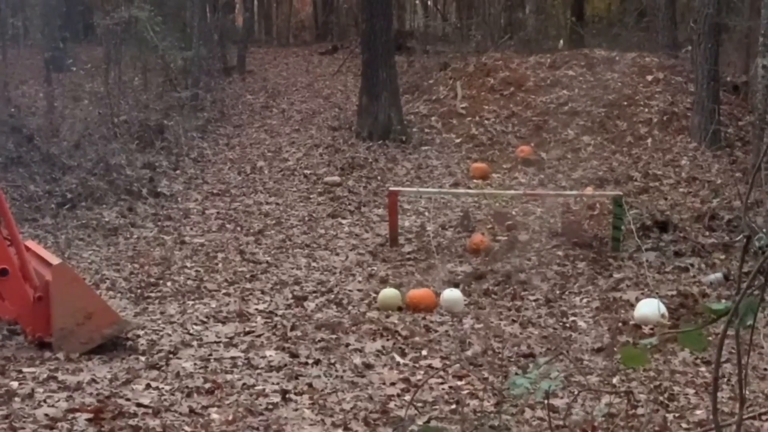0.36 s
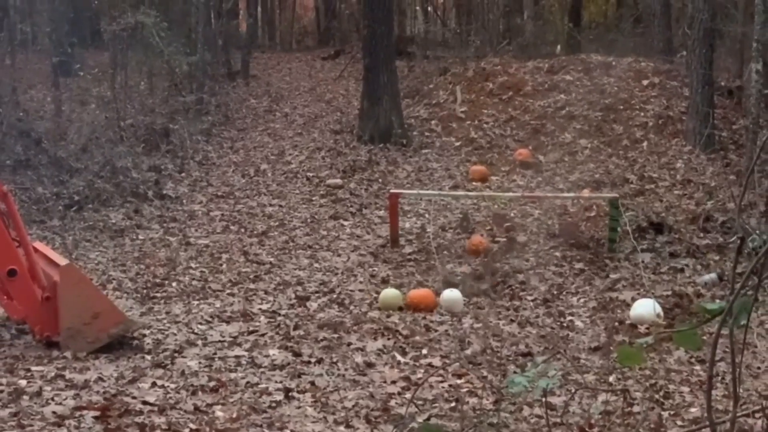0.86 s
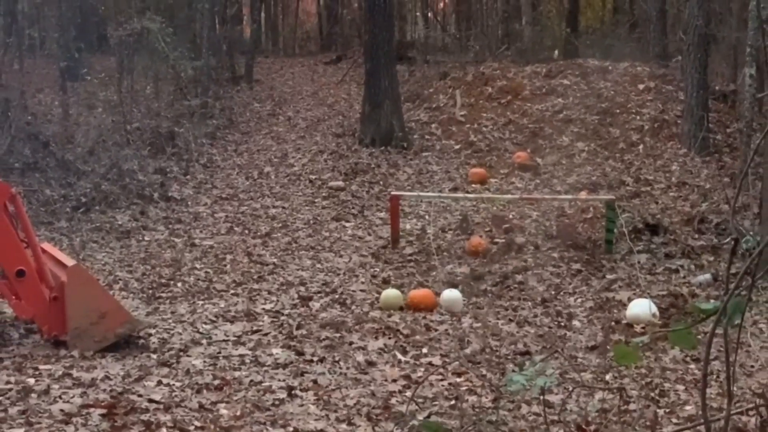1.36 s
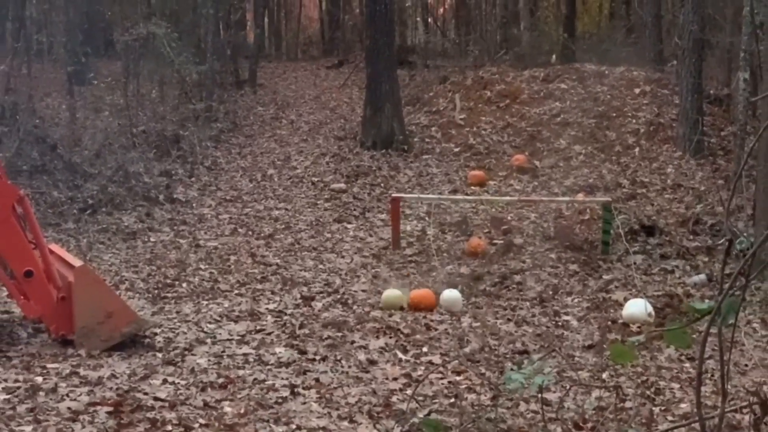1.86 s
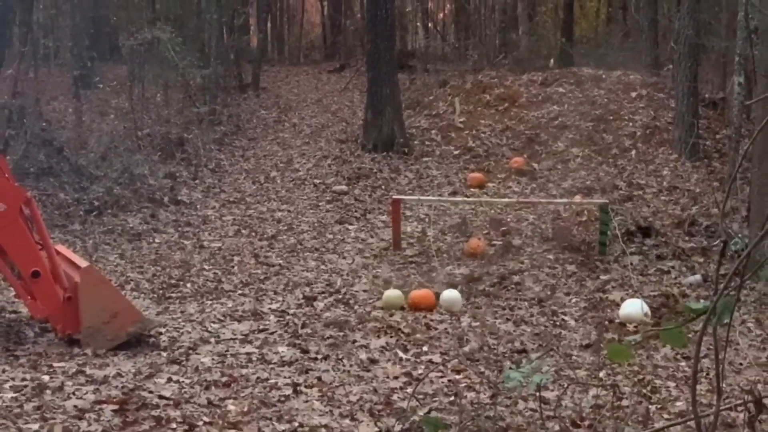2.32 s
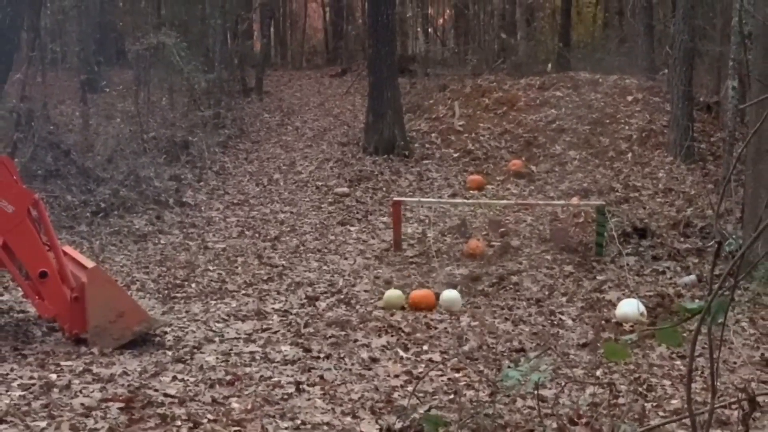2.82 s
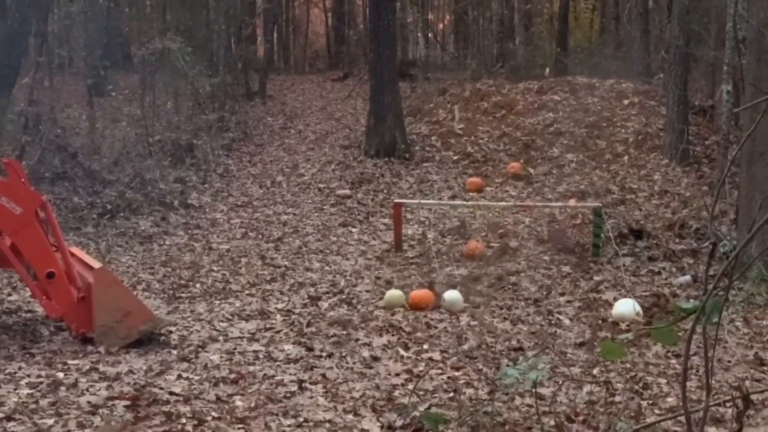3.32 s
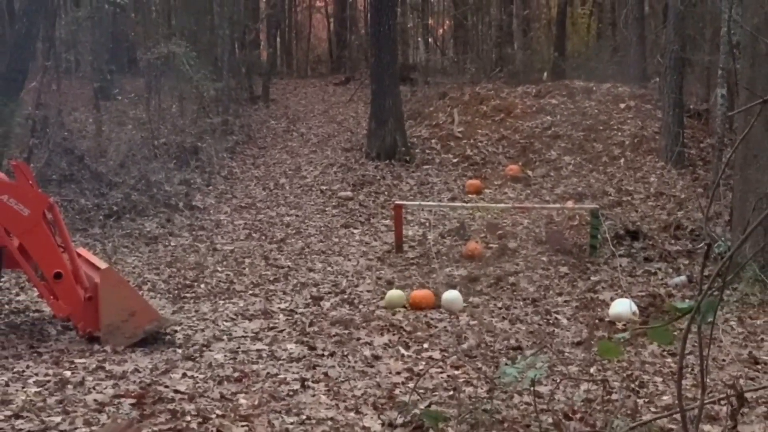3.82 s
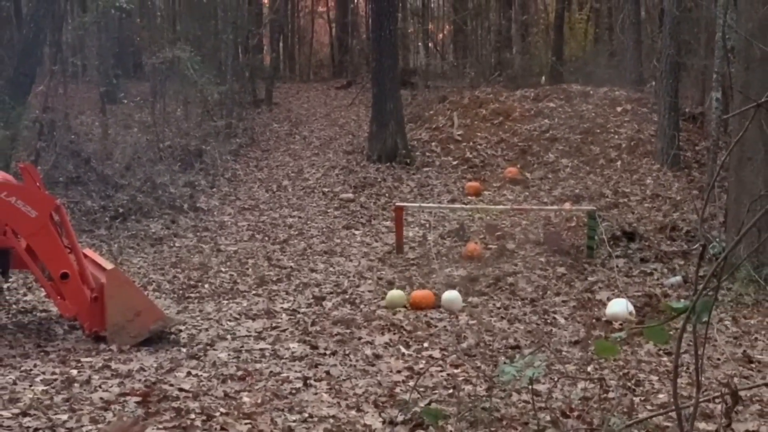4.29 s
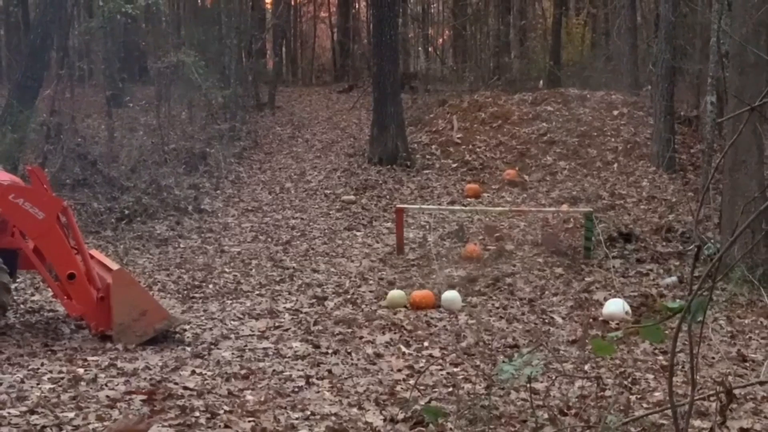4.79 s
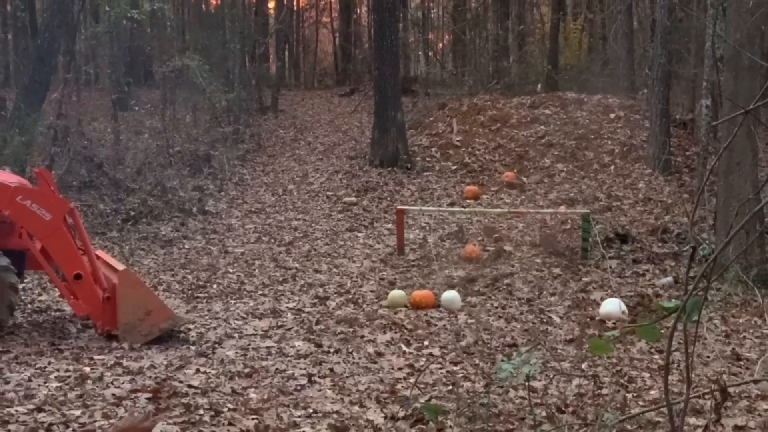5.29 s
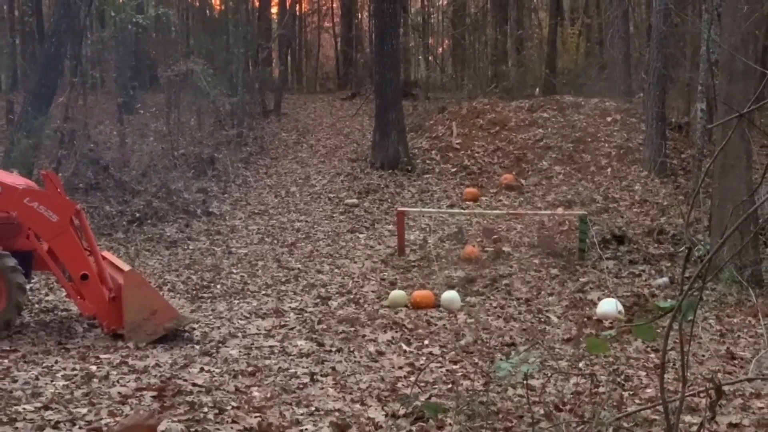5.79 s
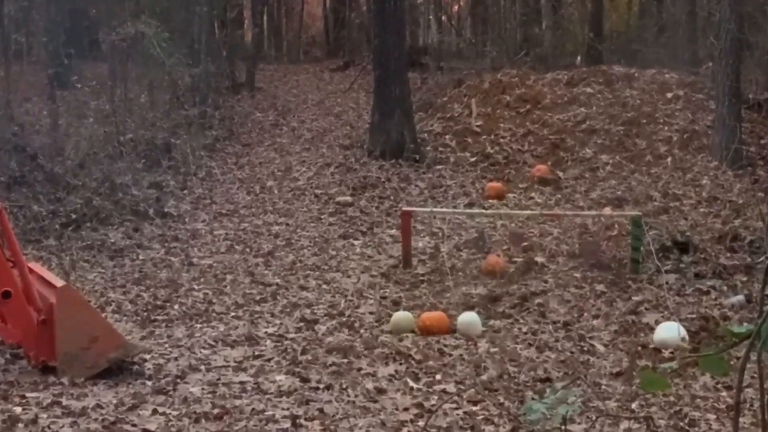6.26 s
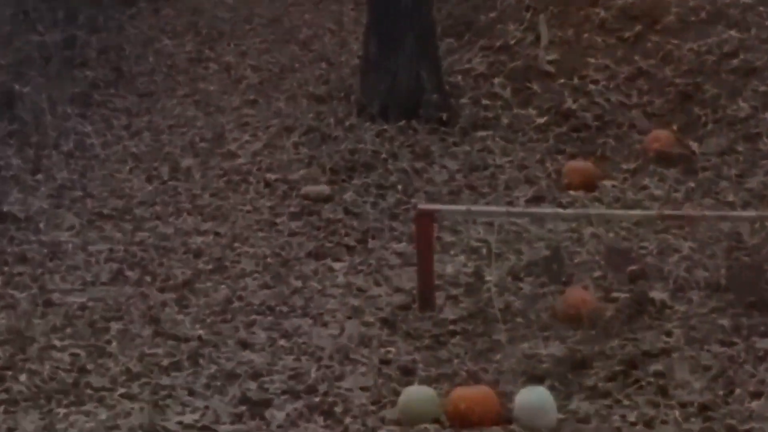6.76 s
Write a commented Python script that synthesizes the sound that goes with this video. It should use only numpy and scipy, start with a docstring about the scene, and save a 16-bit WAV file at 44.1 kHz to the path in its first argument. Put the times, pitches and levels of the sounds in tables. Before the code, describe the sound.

Loud handgun shots crack and thump close by among trees, singly and in quick pairs, their echoes rolling away until the sound abruptly drops.

```python
"""Two pistols in a forest clearing

A sharp and a dull pistol fire in irregular order near a stereo camera, among leafy trees.
Each blast is a low heave, thumps and cracks as ground and nearest trunks return it, crackling
noise and a long woodland tail; much of each pistol's echo noise repeats from shot to shot.
Noise bursts make dry leaves tick over faint, patchy air. The camera squashes the peaks,
and the sound drops sharply near the end."""
import sys
import numpy as np
from scipy import signal
from scipy.fft import rfft, irfft, next_fast_len
from scipy.io import wavfile
from scipy.ndimage import uniform_filter1d

SR = 44100
rng = np.random.default_rng(int(sys.argv[2]) if len(sys.argv) > 2 else 0)


def to_wav(s):
    """Save 16-bit WAV."""
    ch = np.atleast_2d(s).T  # columns
    pcm = np.round(np.clip(ch, -1, 1) * 32767)  # PCM
    wavfile.write(sys.argv[1], SR, pcm.astype(np.int16))


def rack_gain(trim_db):
    """Turn a fader trim in dB into the linear factor to multiply a signal by."""
    fader = np.asarray(trim_db, float)
    return 10 ** (fader / 20)


N = 314433  # samples

# The shots. Each row: start in seconds, pistol (0 sharp, 1 dull), strength in dB.
SHOTS = [(-.047, 1, -2), (.216, 0, -1.52), (.824, 1, -0.5), (1.5598, 0, -0.85), (1.9613, 1, -0.6),
         (3.001, 1, -1.33), (3.198, 0, -1.5), (4.015, 1, -1), (4.514, 0, -0.7), (5.974, 0, -1.43)]
# Direct and echoed arrivals, one list per pistol, before random spread and shot strength.
# Each row: delay in seconds, thump pitch in Hz, left thump in dB, right thump in dB, crack in dB.
ARRIVALS = [
    [(-.0005, 570, -19, -26, -20), (.002, 232.3, -18.5, -9, -29), (.0055, 160.5, -14, -39.5, -28.5),
     (.0135, 607, -16.5, -18.5, -32.5), (.021, 630, -15.5, -18.5, -31), (.029, 209, -16, -34, -39),
     (.056, 684, -14, -31, -22), (.0605, 226, -17, -16, -34.5), (.068, 498, -20.5, -47, -28.5),
     (.0785, 384.8, -40, -35, -26.5), (.099, 300, -35, -39, -35)],
    [(-.001, 441.6, -7, -23, -23), (.0015, 252.3, -13, -7.5, -25.5), (.0048, 405.6, -5, -39, -29),
     (.0105, 480, -16, -15, -33), (.018, 433.6, -19.5, -17.5, -29.5), (.025, 293.5, -16.5, -29.5, -45),
     (.043, 519.5, -24, -24, -23.5), (.06, 231.5, -25, -23.5, -32), (.072, 443, -31, -36, -30),
     (.093, 339, -28.5, -29, -35.5), (.097, 1068, -26.5, -31, -40.5)],
]
# Scatter of each pistol, before shot strength. Each row: crackle rise in seconds, hold in seconds,
# crackle t60 in seconds, crackle level in dB, forest level in dB.
SCATTER = [(.001, 0.017, 0.11, -16, -29), (.007, 0.011, 0.099, -17, -30.5)]
# Heave of the gas cloud, per pistol. Each row: delay in seconds, start pitch in Hz, right lag in seconds.
PUSHES = [(.0148, 80, .0012), (.018, 70, -.001)]
# Heave levels per pistol, before random spread and shot strength.
# Each row: left level in dB, right level in dB, t60 in seconds.
PUSH_LEVELS = [(-11, -14.5, 0.077), (-14, -25, 0.075)]
# Faint noise smeared ahead of each blast: right-hand level in dB per pistol, before shot strength.
SMEAR_DB = [-24, -29.5]
# Relative noise colours. Each row: frequency in Hz, density in dB per Hz.
SMEAR_COLOUR = [(80, -15), (300, 2.5), (1500, -10.5), (4800, -13.5), (5400, -46.5)]
CRACKLE_COLOUR = [(210, -33), (350, -10), (769, -4), (1960, -13.5), (2560, -8.5), (3340, -16.5),
                  (6140, -13.5), (7120, -18.5), (7560, -14.5), (10000, -19.5), (12200, -52.5),
                  (15800, -93.5), (22000, -120)]
FOREST_COLOUR = [(15, -35.5), (25, -2.5), (170, -8.5), (220, -8), (257, -6.5), (379, -7), (723, -11.5),
                 (890, -16), (1450, -19), (2090, -19), (5040, -21), (10100, -19.5), (12200, -61.5),
                 (15800, -81.5), (22000, -120)]
RUSTLE_COLOUR = [(900, -30), (1500, -3), (2200, 5), (3300, -9), (5500, -3), (7000, -3), (11000, -16.5)]
AIR_COLOUR = [(15, -29.5), (30, -15.5), (55, -7), (85, -12.5), (124, -30.5), (232, -3.5), (400, -4),
              (560, -2.5), (1000, -15), (1610, -22), (4100, -37.5), (5040, -29.5), (7240, -37.5),
              (8030, -35), (12200, -51), (15800, -90)]
# Decay of the far woods. Each row: frequency in Hz, t60 in seconds.
FOREST_T60 = [(30, 0.85), (60, .7), (120, 0.23), (220, 1.1), (400, 2.17), (740, 1.65), (1300, 1.727),
              (2200, 1.35), (3500, 0.93), (5200, 0.8), (8000, 0.59), (11000, .4)]
# Echo noise repeated from shot to shot. Each row: frequency in Hz, share of power from 0 to 1.
REPEATED_SHARE = [(200, 1), (1000, .7), (2500, 0.3), (5000, 0)]
# Stereo likeness of the noises. Each row: frequency in Hz, left-right correlation from -1 to 1.
LIKENESS = [(60, 1), (130, 1), (200, 0.87), (350, -0.14), (700, -0.38), (1500, -0.0013), (10000, .01)]
# Ticks of dry leaves. Each row: start in seconds, level in dB before the tick's rise and fall.
LEAVES = [(2.8694, -66), (5.4426, -69.5), (5.4834, -71), (5.499, -74), (5.681, -66), (5.689, -65),
          (5.696, -66.5), (5.703, -70), (5.7244, -75), (5.7944, -70), (5.8802, -73)]
# Narrow dips in the treble. Each row: centre in Hz, width in Hz, gain in dB.
TREBLE_DIPS = [(7093, 350, -11), (8995, 290, -15.5), (10160, 33, -15)]


def pistols():
    """All shots at their times, each pistol with its own set of trees."""
    lead = SR // 10  # room for the noise ahead of the blast
    t = np.arange(-lead, 3 * SR // 2) / SR
    out = np.zeros((2, N + 5 * SR))  # one spare second in front
    trees = [(rush(CRACKLE_COLOUR, len(t)), rush(FOREST_COLOUR, len(t))) for _ in SCATTER]
    for start, pistol, strength_db in SHOTS:
        pistol = int(pistol)
        first = SR + round(start * SR) - lead
        out[:, first:first + len(t)] += shot(t, *trees[pistol], pistol, strength_db)
    return out[:, SR:SR + N]


def shot(t, near_trees, far_trees, pistol, strength_db):
    """One shot at the two microphones: pressure waves, scattered noise and the answer of the woods."""
    forest_db = SCATTER[pistol][4]
    blast = push(t, pistol) + (pistol == 0) * roll(t)
    thumps, cracks = arrivals(t, pistol)
    crackling = crackle(t, pistol, cracks, near_trees)
    woods = rack_gain(forest_db) * forest(t, far_trees)
    return rack_gain(strength_db) * (blast + thumps + crackling + smear_ahead(t, pistol) + woods)


def arrivals(t, pistol):
    """Each path brings a pressure thump and a crack, shorter for higher thumps; delays vary per shot."""
    thumps, cracks = 0, 0
    for delay, hz, left_db, right_db, crack_db in ARRIVALS[pistol]:
        age = t - delay * (1 + 0.014 * rng.standard_normal())
        level_db = np.array([[left_db], [right_db]]) + rng.normal(0, 1, (2, 1))
        length = .0065 * (300 / hz) ** 0.67  # s; 6.5 ms at 300 Hz
        thumps = thumps + rack_gain(level_db) * swing(age, hz, length)
        # a short snap over a longer scatter
        envelope = np.hypot(fading(age, .044), rack_gain(2) * fading(age, 0.0079))
        cracks = np.hypot(cracks, rack_gain(crack_db) * envelope)
    return thumps, cracks


def crackle(t, pistol, cracks, near_trees):
    """Ground and trunks scatter the blast into noise, whose level flickers at random within milliseconds."""
    rise, hold, t60, level_db, _ = SCATTER[pistol]
    onset = (t >= 0) * (1 - np.exp(-(t / rise) ** 2))
    body = rack_gain(level_db) * onset * fading(np.maximum(t - hold, 0), t60)
    flicker = uniform_filter1d(rng.standard_normal((2, len(t))), size=50, axis=1)
    flicker_db = 2.2 * flicker / flicker.std()
    return rack_gain(flicker_db) * np.hypot(body, cracks) * echoes(CRACKLE_COLOUR, near_trees)


def push(t, pistol):
    """A low heave whose pitch sinks as the gas cloud grows, never twice alike."""
    delay, hz, right_lag = PUSHES[pistol]
    left_db, right_db, t60 = PUSH_LEVELS[pistol]
    start = delay + np.array([[0], [right_lag]]) + rng.normal(0, .001)
    age = np.maximum(t - start, 0)
    phase = 2 * np.pi * hz * .03 * np.log(1 + age / .03)  # pitch halves after 30 ms
    level_db = np.array([[left_db], [right_db]]) + rng.normal(0, 0.93, (2, 1))
    return rack_gain(level_db) * np.sin(phase) * fading(age, t60)


def roll(t):
    """A low pressure roll of the sharp pistol, a little earlier or later each time."""
    age = t - .081 - rng.normal(0, 0.0048)
    level_db = np.array([[-29], [-31]]) + rng.normal(0, 1.5)  # left, right
    return rack_gain(level_db) * swing(age, hz=36, length=0.047)


def smear_ahead(t, pistol):
    """Faint noise smeared ahead of the blast, growing exponentially up to it, weaker on the left."""
    level_db = SMEAR_DB[pistol] + np.array([[-6], [0]])
    return rack_gain(level_db) * fading(-t, 0.066) * rush(SMEAR_COLOUR, len(t))


def forest(t, far_trees):
    """Thousands of trunks answer: a quick near slope and a slow far one, timed by frequency."""
    hz, frames, z = signal.stft(echoes(FOREST_COLOUR, far_trees), SR, nperseg=256)
    age = np.maximum(frames + t[0], 0) / along(FOREST_T60, hz)[:, None]  # in units of t60
    far_slope = rack_gain(-60 * age)
    near_slope = rack_gain(7.0 - 60 * age / 0.32)
    # random patches of louder and softer noise
    shaped = z * np.hypot(far_slope, near_slope) * patches(z.shape, bins=5, frames=9, depth_db=1.4)
    tail = signal.istft(shaped, SR, nperseg=256)[1][:, :len(t)]
    build_up = (1 - fading(t, 0.19)) * (t >= 0)
    return tail * build_up


def echoes(colour, trees):
    """Scattered blast noise: the same trees repeat much of it, the air stirs the treble anew."""
    same = lambda hz: np.clip(along(REPEATED_SHARE, hz), 0, 1)
    fresh = rush(colour, trees.shape[1])
    repeated = filtered(trees, lambda hz: np.sqrt(same(hz)))
    stirred = filtered(fresh, lambda hz: np.sqrt(1 - same(hz)))
    return filtered(repeated + stirred, lambda hz: ragged(hz, width_hz=45, depth_db=3.0))


def ragged(hz, width_hz, depth_db):
    """Random narrow-band gains per side, which make the noise uneven in pitch."""
    knots = rng.standard_normal((2, 1000))
    curves = np.array([np.interp(hz / width_hz, np.arange(1000), k) for k in knots])
    return rack_gain(depth_db * curves)


def swing(t, hz, length):
    """A short sine swing of pressure under a smooth hump."""
    u = np.clip(t / length, 0, 1)
    return np.sin(2 * np.pi * hz * t) * np.sin(np.pi * u) ** .8


def leaves():
    """Dry leaves tick and rustle faintly: noise bursts with a quick rise and a slower fall."""
    t = np.arange(N) / SR
    bursts = np.zeros(N)
    for start, level_db in LEAVES:
        age = t - start
        bursts += rack_gain(level_db) * (fading(age, .035) - fading(age, .004))
    return bursts * rush(RUSTLE_COLOUR, N)


def air():
    """The still air of the woods: coloured noise in faint patches of time and pitch."""
    z = signal.stft(rush(AIR_COLOUR, N), nperseg=512)[2]
    patchy = z * patches(z.shape, bins=5, frames=7, depth_db=3)
    return rack_gain(-68.5) * signal.istft(patchy, nperseg=512)[1][:, :N]


def patches(shape, bins, frames, depth_db):
    """Random gains, smoothed over frequency bins and time frames, that spread by depth_db."""
    smooth = uniform_filter1d(rng.standard_normal(shape), bins, axis=1)
    smooth = uniform_filter1d(smooth, frames, axis=2)
    return rack_gain(depth_db * smooth / smooth.std())


def rush(colour, count):
    """Coloured stereo noise of rms 1; mid and side shares set how alike the two sides are."""
    turn = lambda hz: np.arccos(np.clip(along(LIKENESS, hz), -1, 1)) / 2
    shape = lambda hz: rack_gain(along(colour, hz)) * np.array([np.cos(turn(hz)), np.sin(turn(hz))])
    mid, side = filtered(rng.standard_normal((2, count)), shape)
    pair = np.array([mid + side, mid - side])
    return pair / np.sqrt(np.mean(pair ** 2))


def fading(t, t60):
    """An exponential decay that starts at t = 0 and falls 60 dB in t60 seconds."""
    return (t >= 0) * rack_gain(-60 * np.maximum(t, 0) / t60)


def along(points, hz):
    """Reads a curve of (Hz, value) points on a log frequency axis."""
    f, v = np.transpose(points)
    return np.interp(np.log(hz + 1), np.log(f + 1), v)


def filtered(x, response):
    """Filters x by multiplying its spectrum with a response of frequency."""
    m = next_fast_len(x.shape[-1] + 8192)
    spectrum = rfft(x, m) * response(np.fft.rfftfreq(m, 1 / SR))
    return irfft(spectrum, m)[..., :x.shape[-1]]


def scene():
    """Shots and ticking leaves over the still air of the woods."""
    return pistols() + leaves() + air()


def treble_loss(hz):
    """Narrow dips in the treble and a steep slope above 11.9 kHz."""
    dips_db = sum(db * np.exp(-((hz - centre) / width) ** 2) for centre, width, db in TREBLE_DIPS)
    slope_db = -.06 * np.maximum(hz - 11900, 0)
    return rack_gain(dips_db + slope_db)


def low_pass(x):
    """Removes everything above the highest recorded frequency."""
    return signal.sosfilt(signal.butter(12, 12300, fs=SR, output="sos"), x)


def record(dry):
    """The camera squashes the peaks; the treble is thinned and the level drops near the end."""
    ceiling = .66  # full scale = 1
    squashed = dry / (1 + np.abs(dry / ceiling) ** 5) ** (1 / 5)
    ending = np.where(np.arange(N) / SR < 6.855, 1, rack_gain(-33))
    return low_pass(filtered(squashed, treble_loss) * ending)


dry = scene()
out = record(dry)
to_wav(out)
```